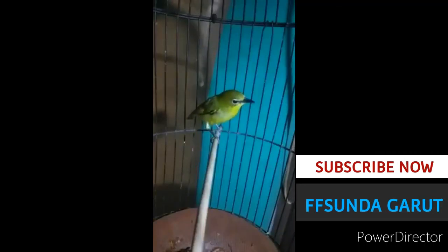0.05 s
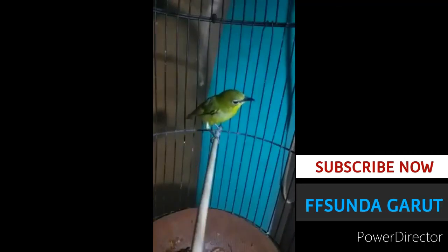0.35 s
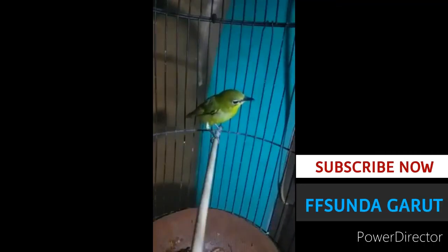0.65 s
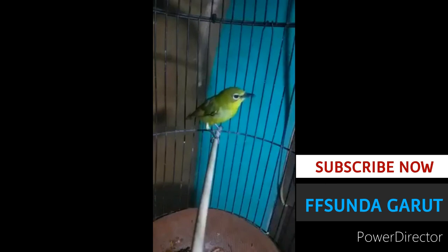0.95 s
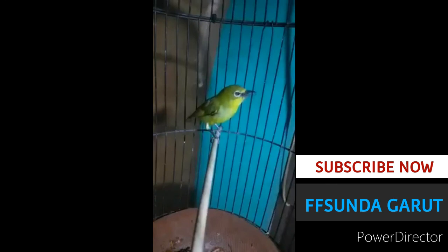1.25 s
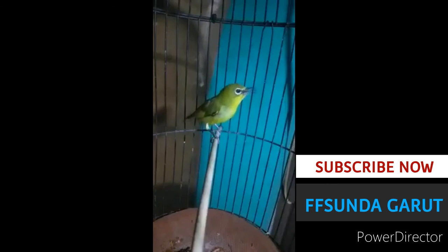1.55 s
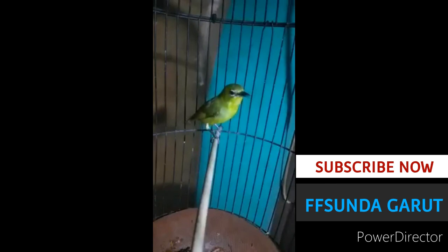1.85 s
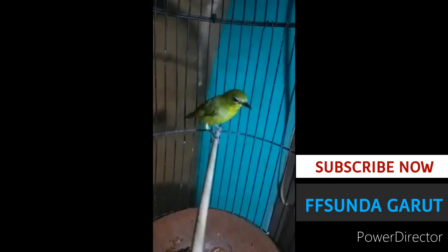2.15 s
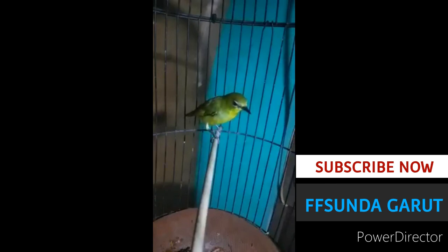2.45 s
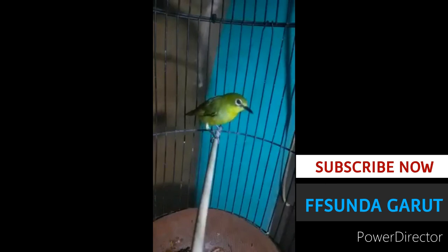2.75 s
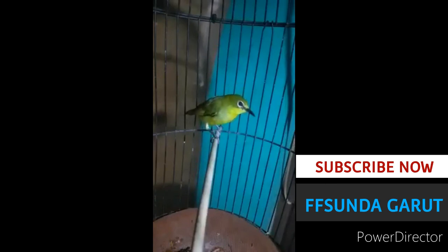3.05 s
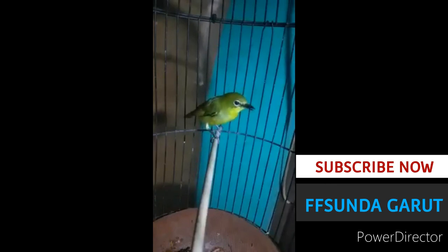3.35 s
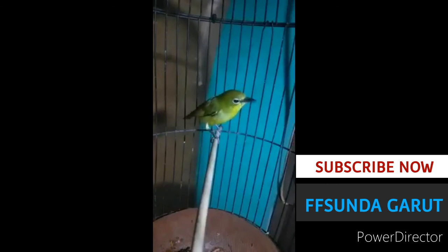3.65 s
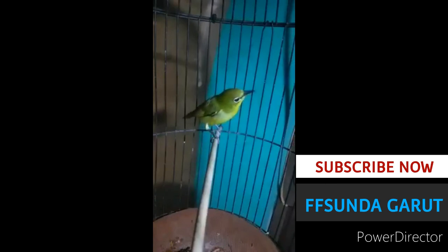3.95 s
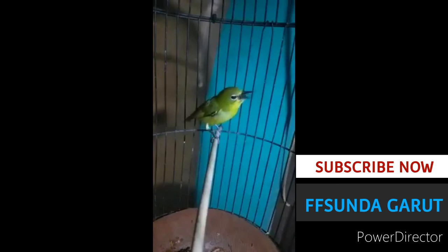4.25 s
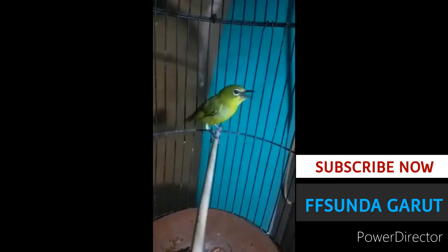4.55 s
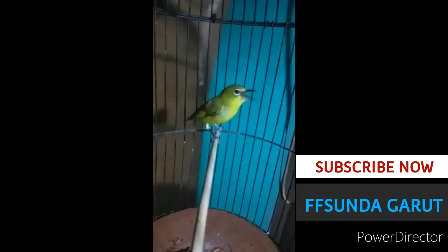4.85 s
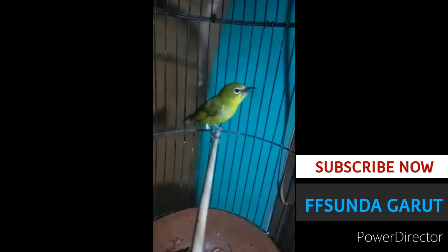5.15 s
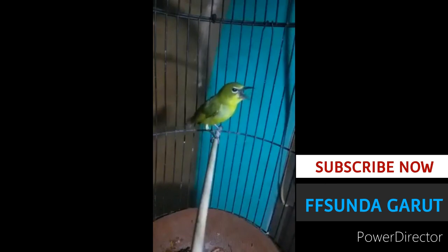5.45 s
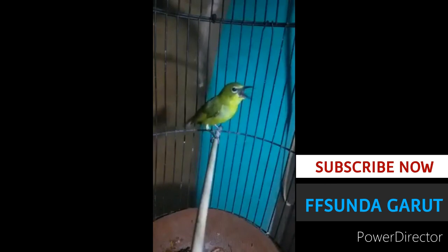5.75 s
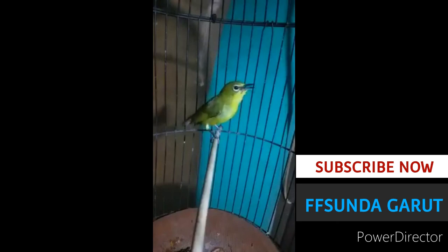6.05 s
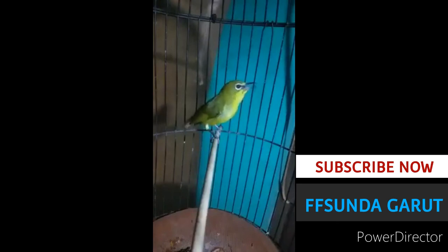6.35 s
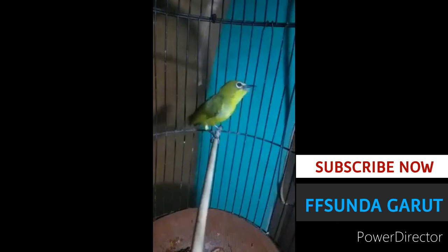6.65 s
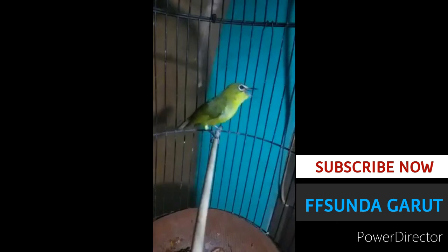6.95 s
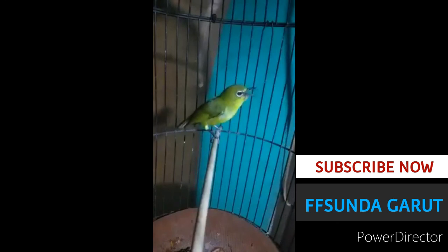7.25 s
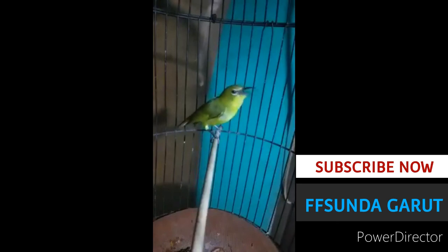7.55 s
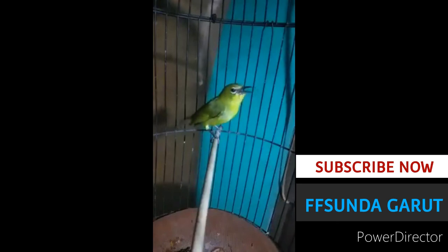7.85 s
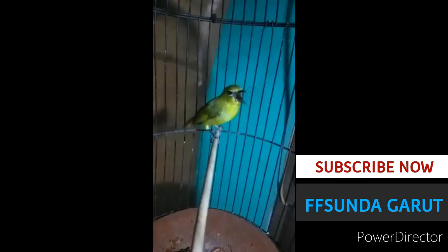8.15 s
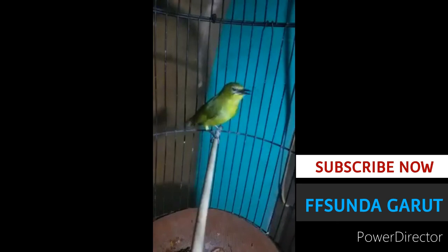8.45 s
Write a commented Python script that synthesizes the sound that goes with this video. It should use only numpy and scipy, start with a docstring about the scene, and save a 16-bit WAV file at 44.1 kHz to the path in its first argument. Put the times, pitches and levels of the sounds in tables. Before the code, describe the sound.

A small caged bird sings close to the microphone in a hard-walled room with a short echo. Muffled traffic and a throbbing engine hum outside throughout, with a faint hiss. For the first second the bird gives soft, high falling whistles, then stronger rising chirps until about 2 seconds. A lull follows with faint, more distant notes, and a soft level whistle with a few slurs from 3 to 3.8 seconds. From about 4.2 seconds the song grows louder and nearly continuous: a quick trill from 4.6 to 5, rapid arched chips until 6.1, two falling notes, a run of seven rising sweeps from 6.5 to 7.4, then mostly falling whistles until the end near 8.7 seconds. A few light knocks, bumps and beak clicks come between 5.6 and 6 seconds, with another tick at 8. Everything dips briefly on the loudest notes.

```python
"""A small room with hard walls, where a caged white-eye sings close to a phone microphone.
The bird's voice box makes pure, gliding whistles: falling slurs, arched chips, rising sweeps and a
quick trill. Softer notes come from farther off. Traffic and a throbbing engine hum outside. Nearby
are a few small ticks: light knocks, handling bumps and two beak clicks.
Automatic gain control turns everything down briefly on the loudest notes."""
import sys
import numpy as np
from scipy import signal
from scipy.fft import rfft, irfft, next_fast_len
from scipy.io import wavfile
from scipy.ndimage import uniform_filter1d

SR = 44100
rng = np.random.default_rng(int(sys.argv[2]) if len(sys.argv) > 2 else 0)


def put_to_file(sound):
    """Save the sound as 16-bit audio at rate SR, in the file named by the first command-line argument."""
    columns = np.atleast_2d(sound).T  # one column per channel
    safe = np.clip(columns, -1, 1)
    whole_steps = np.round(safe * 32767)
    wavfile.write(sys.argv[1], SR, whole_steps.astype(np.int16))


N = 383229

# Levels in the tables are relative: the functions add their own gains.
# How the traffic rises and falls: time_s, road_db, rumble_db
TRAFFIC_LEVELS = [(0, -41, -32.5), (1.3, -41, -34), (1.85, -42, -40.5), (2.25, -46, -34), (2.9, -46.5, -38),
                  (3.5, -44.5, -35), (4.35, -42.5, -35), (4.7, -44.3, -34), (5.3, -41.5, -32.5),
                  (5.65, -45.5, -33.5), (6.15, -43.5, -39), (6.5, -39.5, -32.5), (7.35, -41, -31),
                  (7.7, -42, -36), (8.4, -45.5, -35.5), (8.68, -38.5, -24.5)]
# The tone colours of four steady noises, each: frequency_hz, level_db
TYRE_SPECTRUM = [(100, -31), (220, -1.5), (320, -8.5), (500, -1.5), (780, -3.5), (1050, 0), (1350, 4),
                 (1700, -7.5), (2000, -6.5), (2450, -2), (3200, -10), (4500, -14), (7000, -18.5),
                 (9000, -34)]
RUMBLE_SPECTRUM = [(10, -25), (30, -5.5), (50, -3), (80, -13.5), (110, 2), (150, 3.5), (185, -4.5),
                   (230, -10.5), (320, -15), (600, -63)]
DRONE_SPECTRUM = [(40, -42), (65, -26), (80, -6), (95, -15), (120, -18), (200, -63.5)]
HISS_SPECTRUM = [(2000, 6), (5000, -33.5), (7000, 4), (8300, 3), (8900, -9.5), (9800, -1.5), (11000, -52),
                 (12500, -28), (14000, -42.5), (15600, -72)]
# Swells of the deep drone in the street: peak_s, half_length_s, level_db
DRONE_PEAKS = [(0.803, 0.53, -41.5), (3.696, 0.11, -40.5), (4.322, 0.088, -34), (6.12, 0.21, -37),
               (7.7, 0.28, -41.5), (8.65, 0.12, -50)]
# The engine, whose upper harmonics at times grow stronger: time_s, firings_per_s, level_db, lift_db
ENGINE_RUN = [(0, 29.2, -44, 4), (1.3, 28.8, -39, -7), (2.3, 26.7, -42, -17), (2.5, 27.4, -34, -2),
              (2.9, 31.4, -36, -2), (3.3, 30.1, -35, 3), (3.6, 29.2, -45.5, 5), (4.5, 27.7, -36, 3.5),
              (5, 28, -40, 11.5), (5.4, 29.7, -36.5, 8.5), (5.9, 29.5, -39.5, 6), (6.4, 29.2, -38.5, 11),
              (6.7, 30.3, -35, 7.5), (7.35, 26.7, -34.5, 5.5), (7.7, 26.7, -41.5, 2.5),
              (8.68, 31.3, -46.5, 7)]
# The exhaust as heard through the wall: frequency_hz, level_db
EXHAUST_SPECTRUM = [(30, -1), (60, -4.5), (90, -20.5), (120, -3), (150, 5.5), (180, -0.5), (212, -20.5),
                    (270, -17), (305, -27), (335, -17), (370, -29.5), (440, -18), (520, -30)]
# How well each pitch carries from the beak: pitch_hz, gain_db
BEAK_RESPONSE = [(2600, -0.1), (3500, -1.5), (4000, -0.9), (4350, 4), (4750, -2), (5300, -0.5), (5800, 0.1),
                 (6500, 5), (7200, 4.9), (7800, 4.8), (8400, -1)]
# Strength of the overtone an octave up: overtone_hz, gain_db
OCTAVE_RESPONSE = [(6000, 12), (8500, -7), (10000, 2), (11900, -3.5), (12800, -9), (16000, -3)]
# Falling notes: top_s, fall_s, top_hz, end_hz, bend, scoop_s, level_db, swell_db
SLUR_NOTES = [(0, .027, 3570, 3200, .95, 0.0067, -41, -5),
              (0.054, 0.044, 7840, 5320, 0.41, 0.0099, -38, -10), (.223, .14, 8500, 4326, 2.33, 0, -32, -5),
              (.511, 0.087, 7610, 3830, 1.9, .007, -32, 1.5),
              (0.715, 0.084, 7590, 4530, 0.94, 0.021, -29.5, 1.5),
              (.947, 0.13, 8130, 5350, 1.9, 0.026, -30, 2.5),
              (1.472, 0.034, 6970, 6530, 1.9, .003, -19, -5.5),
              (2.06, 0.096, 7370, 2925, 4.7, 0, -23.5, -16), (3.325, .12, 6760, 4410, 0.24, 0, -34.5, 9),
              (3.568, .023, 7300, 6500, 2.3, 0.0011, -37.5, 2),
              (3.626, 0.08, 8260, 6000, 1.75, 0.027, -33.5, -2.5),
              (4.42, 0.087, 7840, 5260, 0.48, .008, -20, -5), (5.058, 0.092, 7270, 5030, 4.55, 0, -21, -4),
              (6.186, 0.096, 6500, 3854, 3.2, 0, -21, 2.5), (6.33, 0.097, 7090, 3713, 4.08, 0, -19, -3.5),
              (7.456, .11, 8400, 5050, 3.2, 0.0066, -22, 1.5),
              (7.632, 0.036, 7900, 5480, 1.22, 0.018, -24, 1),
              (7.721, .097, 8110, 4280, 1.21, 0.0043, -23, -5.5),
              (7.937, 0.14, 8620, 5205, 3.16, 0.016, -22, 1),
              (8.144, .094, 7530, 4430, 0.58, .017, -24, -1.5),
              (8.297, 0.071, 8160, 5770, 8.9, 0.0064, -22, 6),
              (8.468, 0.04, 5320, 4490, 0.95, 0.012, -21.5, 8),
              (8.665, .025, 4590, 4250, 2.2, 0.012, -16.5, 9)]
# Brief kinks in the pitch of those notes: time_s, shift_hz
SLUR_KINKS = [(.252, 1204), (.731, -700), (.96, -450), (.985, 890), (2.076, 1150), (3.385, 250),
              (4.435, -660), (7.658, 435), (7.738, -380), (7.956, -450), (7.973, 612), (8.154, -690),
              (8.172, 300)]
# Echoes from nearby surfaces: delay_s, gain
CAGE_ECHOES = [(.0019, 0.14), (.0043, -0.049), (.0066, 0.13), (.0091, -0.23), (0.0131, .15), (.0184, 0.071),
               (0.025, 0.12)]
# How long the room's ring takes to fade by 60 dB: frequency_hz, fade_s
ROOM_FADE = [(500, .4), (3000, 0.17), (6000, 0.24), (9000, 0.21), (14000, 0.12)]
# Soft falling notes from farther off: start_s, length_s, start_hz, end_hz, level_db
FAR_NOTES = [(0.149, 0.069, 7330, 4600, -49), (2.47, 0.045, 7200, 5640, -59),
             (2.876, 0.053, 7040, 5220, -53.5), (3.181, 0.067, 7150, 4230, -58),
             (3.388, 0.044, 7500, 7040, -50), (3.736, .105, 7300, 4630, -41.5),
             (3.97, 0.062, 7360, 5070, -46), (4.092, 0.061, 7360, 4796, -48)]
# Arched notes: start_s, length_s, start_hz, top_hz, end_hz, top_at (0-1), level_db, swell_db
CHIP_NOTES = [(0.366, 0.019, 4840, 6100, 4430, 0.47, -35, -4),
              (0.387, 0.052, 5000, 6800, 5050, 0.67, -40.5, -5),
              (0.426, 0.033, 4730, 6090, 5130.0, 0.64, -32.5, -10),
              (1.345, 0.079, 4900, 5140.0, 4760, 0.36, -28, 10.5),
              (1.557, 0.089, 4730, 4910, 4630, 0.38, -30, 5),
              (4.244, 0.12, 3290, 5436, 5130, 0.57, -25.5, 13),
              (5.295, 0.075, 5670, 6030, 4590, 0.4, -19.5, 10),
              (5.433, 0.064, 5990, 6175, 4710, 0.29, -19.5, 4.5),
              (5.548, 0.035, 6530, 7580, 6800, 0.71, -22, 0),
              (5.615, 0.026, 7500, 8030, 6800, 0.59, -23, -3),
              (5.676, 0.031, 7520.0, 7890, 6860, 0.72, -22.5, 0),
              (5.708, 0.06, 8390, 8570, 7900, 0.89, -23.5, 13.5),
              (5.797, 0.0365, 5110, 6520, 6240, 0.49, -24, -4),
              (5.855, 0.024, 7660, 8370, 8380, 0.43, -21.0, 16),
              (5.917, 0.031, 5070, 6620, 6200, 0.51, -23.5, -3),
              (5.988, 0.029, 8140, 8350, 7820, 0.4, -20, -9), (6.047, 0.03, 5240, 6490, 6200, 0.7, -18, 2),
              (6.116, 0.031, 6930, 7910, 7540, 0.47, -22.5, 0),
              (8.406, 0.035, 6650, 6880, 6650, 0.48, -25.0, -2)]
# Rising notes: start_s, length_s, low_hz, high_hz, steepest_at (0-1), steepness, level_db, swell_db
SWEEP_NOTES = [(1.132, 0.056, 4870, 8020, 1, 1.5, -25, 0.5),
               (1.222, 0.064, 4730, 7820, 0.6, 0.57, -25.5, 15.5),
               (1.69, 0.11, 3516, 6690, 0.56, 7.8, -27, -0.5),
               (1.882, 0.13, 2633, 4370, 0.67, 6.1, -26.5, 8.5),
               (3.854, 0.038, 5530, 9100, 0.52, 8, -39, -32),
               (3.861, 0.049, 2740, 4910, 0.07, 6.5, -30, 18),
               (5.161, 0.057, 4960, 6610, 0.51, 3.9, -20.5, 2.5),
               (6.486, 0.044, 4690, 5606, 0.52, 7.3, -23, -4),
               (6.579, 0.04, 3890, 5790, 0.29, 4.3, -20.5, -10),
               (6.656, 0.065, 4245, 6270, 0.42, 6.8, -18.5, -3),
               (6.768, 0.073, 4220, 6577, 0.55, 6.9, -18, 6),
               (6.888, 0.075, 4300, 6667, 0.6, 5.9, -19, 4.5),
               (7.011, 0.077, 4170, 6424, 0.42, 4.9, -22, 4),
               (7.15, 0.078, 4210, 6430, 0.51, 6.7, -21.5, 1),
               (7.293, 0.083, 4170, 6460, 0.55, 6.6, -21, 0.5),
               (8.548, 0.061, 3520.0, 5630, 0.5, 18, -16.5, 12.5)]
# The path of one long, soft whistle: time_s, pitch_hz, level_db
WHISTLE_PATH = [(3.07, 3290, -52), (3.156, 3570, -52.5), (3.252, 3657, -40), (3.484, 3555, -41),
                (3.614, 3543, -44), (3.78, 3496, -37.5), (3.83, 3280, -44)]
# The quick trill: start_s, rise_s, hold_s, low_hz, high_hz, level_db
TRILL_NOTES = [(4.619, 0.022, .003, 5980, 7520, -25), (4.658, .03, 0.0014, 5840, 7270, -21.5),
               (4.717, 0.024, 0.0025, 5700, 7730, -20), (4.769, 0.03, 0.0026, 5800, 7330, -20),
               (4.824, 0.0265, 0.0041, 6070, 7000, -22.5), (4.9, 0.022, 0.011, 5850, 7060, -21),
               (4.971, .021, 0.021, 6350, 7290, -22)]
# Small ticks (light knocks, handling bumps and two beak clicks): start_s, tick_db, tick_hz, push_db
SMALL_TICKS = [(5.578, -34.5, 895, -22), (5.637, -35, 1500, -20), (5.698, -31, 1070, -17),
               (5.738, -35, 786, -29), (5.762, -36.5, 700, -39), (5.874, -35.5, 2000, -45),
               (6.001, -36.5, 2120, -49), (7.986, -28.5, 700, -21.5)]


def gain_of(db):
    """Turns decibels into a number to multiply by."""
    return 10 ** (np.asarray(db) / 20)


def unit_rms(x):
    """Scales a signal to an average strength (rms) of 1."""
    return x / np.sqrt(np.mean(x ** 2) + 1e-20)


def value_at(table, hz):
    """Looks up a frequency in a table, blending between rows on a log scale."""
    table_hz, values = np.transpose(table)
    return np.interp(np.log(hz + 1), np.log(table_hz + 1), values)


def curves(rows, t):
    """Joins the dots of a timed table: one curve per column, at the times t."""
    times, *columns = np.transpose(rows)
    return [np.interp(t, np.sort(times), column) for column in columns]


def add(mix, start_s, sound):
    """Mixes a sound in at a given time."""
    part = mix[max(round(start_s * SR), 0):][:len(sound)]
    part += sound[:len(part)]


def noise(spectrum):
    """Steady noise with a given tone colour, rms 1."""
    size = next_fast_len(N)
    colour = gain_of(value_at(spectrum, np.fft.rfftfreq(size, 1 / SR)))
    return unit_rms(irfft(rfft(rng.standard_normal(size)) * colour, size)[:N])


def waver(hz):
    """A smooth random wobble up to about the given rate, rms 1."""
    return noise([(hz / 2, 0), (hz, -3), (hz * 2, -30), (hz * 10, -120)])


def traffic(tyre_gain_db=0.5, rumble_gain_db=-5, lumps_db=1.8, drone_floor_db=-47, hiss_db=-59):
    """Tyre noise, a lumpy rumble and a deep drone come through the wall, over a thin, steady hiss."""
    t = np.arange(N) / SR
    road_db, rumble_db = curves(TRAFFIC_LEVELS, t)
    tyres = gain_of(road_db + tyre_gain_db) * noise(TYRE_SPECTRUM)
    rumble = gain_of(rumble_db + rumble_gain_db + lumps_db * waver(5.3)) * noise(RUMBLE_SPECTRUM)
    swells = sum(gain_of(db) * np.exp(-((t - peak_s) / width_s) ** 2 / 2)
                 for peak_s, width_s, db in DRONE_PEAKS)
    drone = np.hypot(gain_of(drone_floor_db), swells) * noise(DRONE_SPECTRUM)
    return tyres + rumble + drone + gain_of(hiss_db) * noise(HISS_SPECTRUM)


def engine(gain_db=-1):
    """Each firing sends a pulse down the exhaust, making a throbbing hum whose upper harmonics at times grow
    stronger."""
    firings_per_s, level_db, lift_db = curves(ENGINE_RUN, np.arange(N) / SR)
    firing_hz = firings_per_s * (1 + .005 * waver(8))
    phase = 2 * np.pi * np.cumsum(firing_hz) / SR
    pulses = sum(gain_of(value_at(EXHAUST_SPECTRUM, k * firing_hz) + lift_db * (k > 7))
                 * np.cos(k * phase) for k in range(1, 18))
    return gain_of(level_db + gain_db) * unit_rms(pulses)


def voice_box(notes, jitter, flutter_db, half_db, attack_s, release_s, flick, fifth_db=-5):
    """Whistles each (start_s, pitch curve, level curve): held pitches are pure, fast glides tremble."""
    octave_db, fuzz_db, fast_glide_hz_per_s, flick_s = -47, -38, 30000, .0026
    out = np.zeros(N)
    tremble, flutter, fuzz = waver(310), waver(130), waver(1300)
    for start_s, pitch, loudness in notes:
        times = start_s + np.arange(len(pitch)) / SR
        on_s, off_s = start_s - attack_s / 2, times[-1] + release_s / 2
        span = np.arange(max(int(on_s * SR), 0), min(int(off_s * SR), N))
        t = span / SR
        hz = uniform_filter1d(np.interp(t, times, pitch), size=150)
        unsteady = .2 + np.tanh(abs(np.gradient(hz)) * SR / fast_glide_hz_per_s)
        level_db = np.interp(t, times, loudness) + value_at(BEAK_RESPONSE, hz)
        level_db += flutter_db * unsteady * flutter[span]
        if pitch[-1] < pitch[-2]:  # a falling note flicks down as the tension lets go
            hz = hz * (1 - flick * np.exp((t - off_s) / flick_s))
        phase = 2 * np.pi * np.cumsum(hz * (1 + jitter * unsteady * tremble[span])) / SR
        ramp = np.clip(np.minimum((t - on_s) / attack_s, (off_s - t) / release_s), 0, 1)
        envelope = np.sqrt(2) * gain_of(level_db) * np.sin(np.pi / 2 * ramp) ** 2
        # A faint high fuzz is heard around the octave overtone.
        octave_gain = gain_of(octave_db) + gain_of(fuzz_db) * fuzz[span]
        octave = gain_of(value_at(OCTAVE_RESPONSE, 2 * hz)) * octave_gain * np.sin(2 * phase)
        half = (1 + .5 * flutter[span]) * np.sin(phase / 2)
        fifth = gain_of(fifth_db) * fuzz[span] * np.sin(1.5 * phase)
        out[span] += envelope * (np.sin(phase) + octave + gain_of(half_db) * (half + fifth))
    return out


def note_level(progress, level_db, swell_db, belly_db):
    """Loudness as a note goes from 0 to 1: a steady swell or fade, plus a fuller middle (the belly)."""
    return level_db + swell_db * (progress - .5) + belly_db * (4 * progress * (1 - progress) - 2 / 3)


def settle(progress, bend):
    """Falls from 1 to 0, fast at first; more bend makes it level out sooner."""
    return (np.exp(-bend * progress) - np.exp(-bend)) / (1 - np.exp(-bend))


def slur(top_s, fall_s, top_hz, end_hz, bend, scoop_s, level_db, swell_db):
    """The pitch scoops up to the top, then relaxes downward, sometimes with a kink on the way."""
    scoop_hz_per_s, scoop_db, kink_s = 28000, -6, .007
    t = np.arange(-scoop_s, fall_s, 1 / SR)
    progress = np.clip(t / fall_s, 0, 1)
    before_top_s = np.maximum(-t, 0)
    kinks = sum(shift_hz * np.exp(-((top_s + t - time_s) / kink_s) ** 2)
                for time_s, shift_hz in SLUR_KINKS)
    hz = end_hz + (top_hz - end_hz) * settle(progress, bend) + kinks - scoop_hz_per_s * before_top_s
    soft_start_db = scoop_db * before_top_s / max(scoop_s, 1 / SR)
    return top_s + t[0], hz, note_level(progress, level_db, swell_db, belly_db=1) + soft_start_db


def cage(x):
    """The first echoes from the cage floor and the wall beat against each glide."""
    out = x.copy()
    for delay_s, gain in CAGE_ECHOES:
        add(out, delay_s, gain * x)
    return out


def room(x, gap_s=.0016):
    """The hard walls return a dense tail of echoes, and the treble dies first."""
    hz, t, spectrum = signal.stft(rng.standard_normal(SR // 2), SR, nperseg=256)
    fade = gain_of(-60 * t / value_at(ROOM_FADE, hz)[:, None])
    tail = signal.istft(spectrum * fade, SR, nperseg=256)[1]
    tail *= np.arange(len(tail)) > gap_s * SR
    song_band = abs(np.fft.rfftfreq(len(tail), 1 / SR) - 6000) < 2500
    tail /= np.sqrt(np.mean(abs(rfft(tail)[song_band]) ** 2))
    return signal.oaconvolve(x, tail)[:N]


def far_slur(start_s, length_s, start_hz, end_hz, level_db):
    """A plain, distant fall in pitch that fades a little as it goes."""
    progress = np.arange(0, length_s, 1 / SR) / length_s
    hz = end_hz + (start_hz - end_hz) * settle(progress, bend=.8)
    return start_s, hz, note_level(progress, level_db, swell_db=-1, belly_db=0)


def chip(start_s, length_s, start_hz, top_hz, end_hz, top_at, level_db, swell_db):
    """The pitch arches over a rounded top."""
    progress = np.arange(0, length_s, 1 / SR) / length_s
    rising_hz = top_hz - (top_hz - start_hz) * (1 - progress / top_at) ** 2
    falling_hz = top_hz - (top_hz - end_hz) * ((progress - top_at) / (1 - top_at)) ** 2
    hz = np.where(progress < top_at, rising_hz, falling_hz)
    return start_s, hz, note_level(progress, level_db, swell_db, belly_db=6)


def sweep(start_s, length_s, low_hz, high_hz, steepest_at, steepness, level_db, swell_db):
    """The pitch climbs along an S-shaped curve."""
    progress = np.arange(0, length_s, 1 / SR) / length_s
    climb = np.tanh(steepness * (progress - steepest_at) / 2)
    hz = low_hz + (high_hz - low_hz) * (climb - climb[0]) / (climb[-1] - climb[0])
    return start_s, hz, note_level(progress, level_db, swell_db, belly_db=.5)


def long_whistle(gain_db=2):
    """A nearly level tone that eases in and droops at the end."""
    start_s, end_s = WHISTLE_PATH[0][0], WHISTLE_PATH[-1][0]
    hz, level_db = curves(WHISTLE_PATH, np.arange(start_s, end_s, 1 / SR))
    return start_s, hz, level_db + gain_db


def trill_note(start_s, rise_s, hold_s, low_hz, high_hz, level_db, bend=1.68, sag_hz_per_s=20000):
    """The pitch whips upward ever faster, then sags while the note is held."""
    t = np.arange(0, rise_s + hold_s, 1 / SR)
    climb = np.minimum(t / rise_s, 1) ** bend
    hz = low_hz + (high_hz - low_hz) * climb - sag_hz_per_s * np.maximum(t - rise_s, 0)
    return start_s, hz, note_level(t / t[-1], level_db, swell_db=6.5, belly_db=4.5)


def ticks(push_s=.022, tick_s=.0085):
    """Knocks, bumps and beak clicks are short bursts of noise; a nudge to the phone adds a slow push."""
    out, t = np.zeros(N), np.arange(SR // 5) / SR
    push = np.exp(-t / push_s) - np.exp(-t / tick_s)
    for start_s, tick_db, tick_hz, push_db in SMALL_TICKS:
        band = signal.butter(2, [tick_hz / 1.9, tick_hz * 1.33], "bandpass", fs=SR, output="sos")
        tick = unit_rms(signal.sosfilt(band, rng.standard_normal(len(t)))) * np.exp(-t / tick_s)
        add(out, start_s, gain_of(push_db) * push + gain_of(tick_db) * tick)
    return out


def song():
    """All the near bird's notes; the voice box's faint half-pitch tone is strongest in the trill."""
    slurs = voice_box([slur(*row) for row in SLUR_NOTES] + [long_whistle()], jitter=.015,
                      flutter_db=3.5, half_db=-45, attack_s=.008, release_s=.0095, flick=.24)
    sweeps = voice_box([sweep(*row) for row in SWEEP_NOTES], jitter=.015,
                       flutter_db=3.5, half_db=-53, attack_s=.0099, release_s=.004, flick=0)
    chips = voice_box([chip(*row) for row in CHIP_NOTES], jitter=.0097, fifth_db=3,
                      flutter_db=4, half_db=-43.5, attack_s=.0035, release_s=.0048, flick=.096)
    trill = voice_box([trill_note(*row) for row in TRILL_NOTES], jitter=.016,
                      flutter_db=4.5, half_db=-34.5, attack_s=.0055, release_s=.0047, flick=.11)
    return gain_of(-1) * (slurs + sweeps + chips) + gain_of(-2.5) * trill


def scene(near_echo_db=-7.5, far_direct_db=-7):
    """Mixes the near bird, the distant notes (mostly room echo), the street and the ticks, in mono."""
    near = song()
    far = voice_box([far_slur(*row) for row in FAR_NOTES], jitter=.021,
                    flutter_db=1.5, half_db=-45, attack_s=.0046, release_s=.005, flick=.1)
    birds = cage(near) + gain_of(far_direct_db) * far + room(gain_of(near_echo_db) * near + far)
    return (birds + traffic() + engine() + ticks())[None]


def record(dry, limit_db=-14.5, recovery_db_per_s=26, cutoff_hz=15600):
    """Gain control drops at once on a loud note and creeps back; the highest treble is rolled off."""
    power_db = 10 * np.log10(abs(uniform_filter1d(dry[0] ** 2, size=180)) + 1e-12)
    recovery_db = np.arange(N) / SR * recovery_db_per_s
    fading_peak_db = np.maximum.accumulate(power_db + recovery_db) - recovery_db
    excess_db = np.maximum(fading_peak_db - limit_db, 0)
    turned_down = dry / gain_of(uniform_filter1d(excess_db, size=120))
    microphone = signal.firwin2(129, [0, 11400, 12800, SR / 2], gain_of([0, 0, -17, -40]), fs=SR)
    low_pass = signal.firwin(511, cutoff_hz, window=("kaiser", 9), fs=SR)
    return signal.oaconvolve(turned_down, np.convolve(microphone, low_pass)[None], "same", axes=1)


dry = scene()
out = record(dry)
put_to_file(out)
```